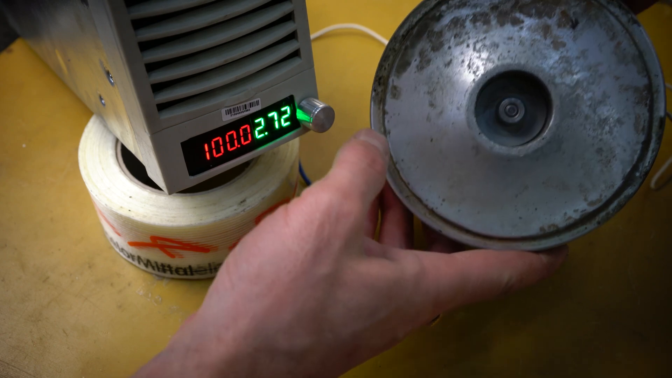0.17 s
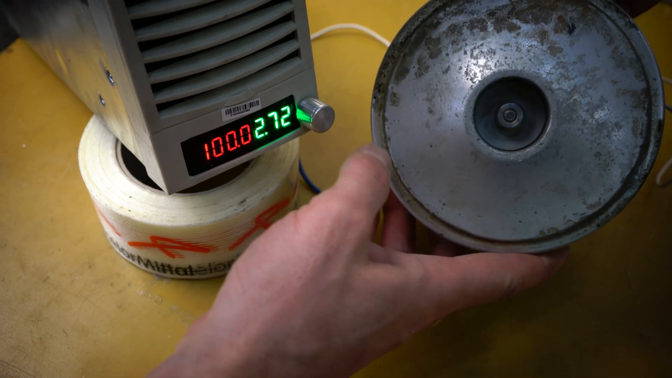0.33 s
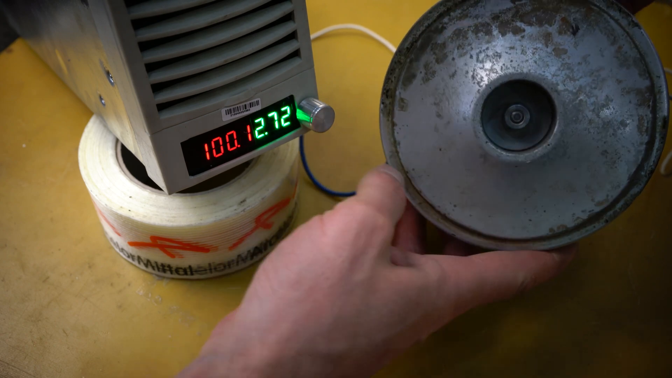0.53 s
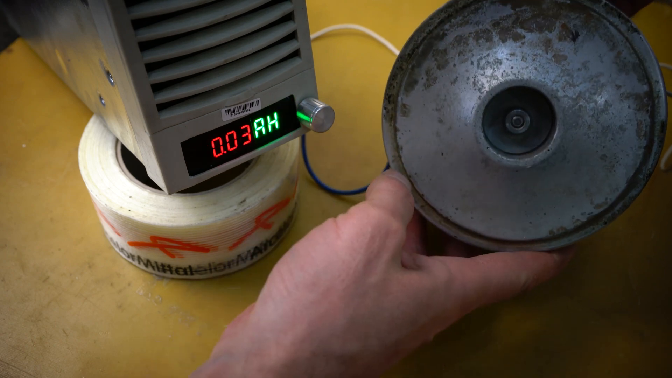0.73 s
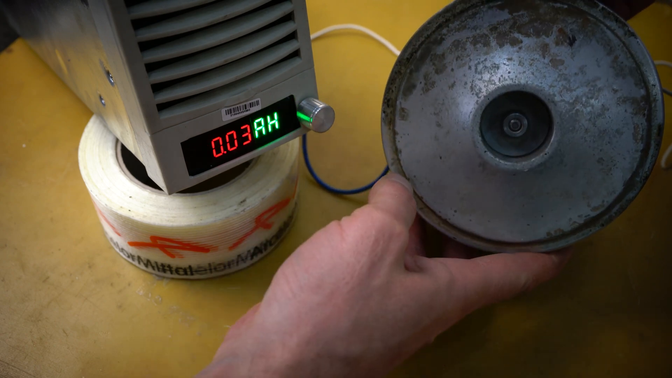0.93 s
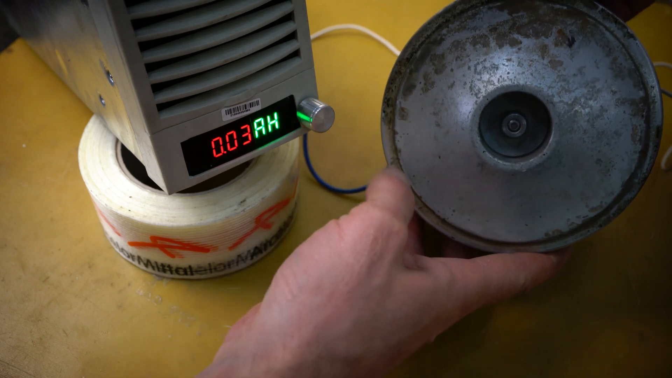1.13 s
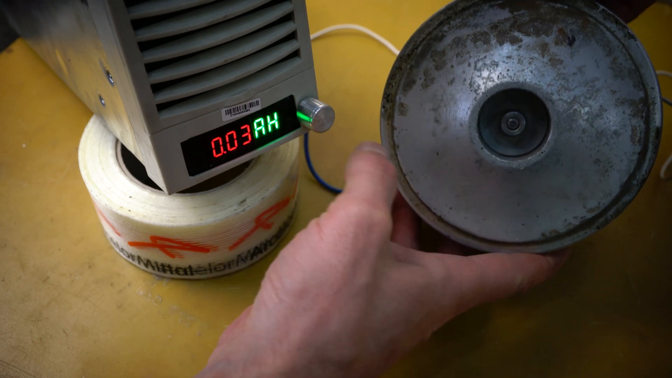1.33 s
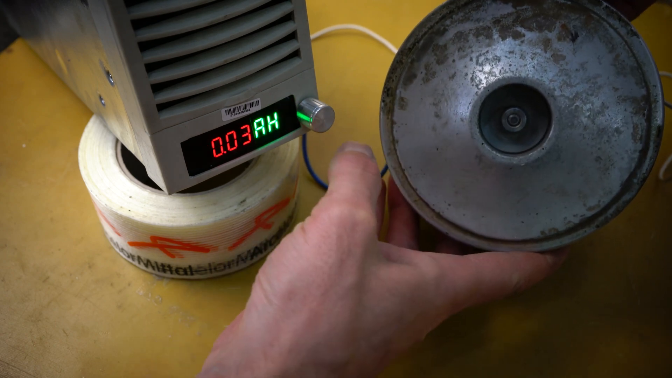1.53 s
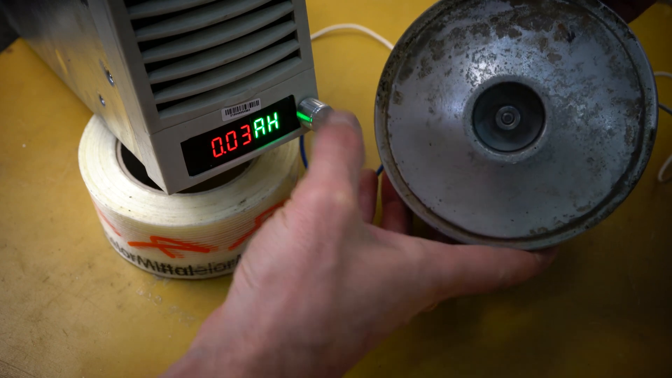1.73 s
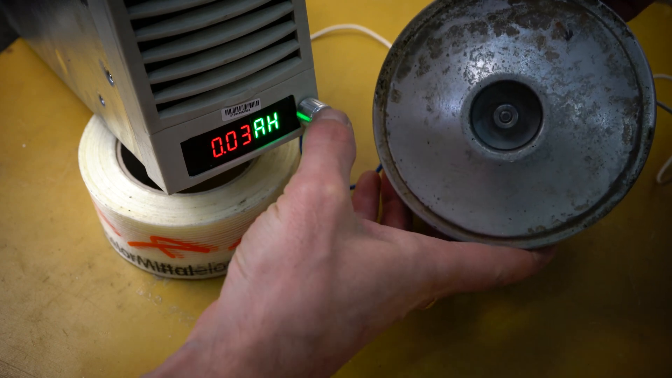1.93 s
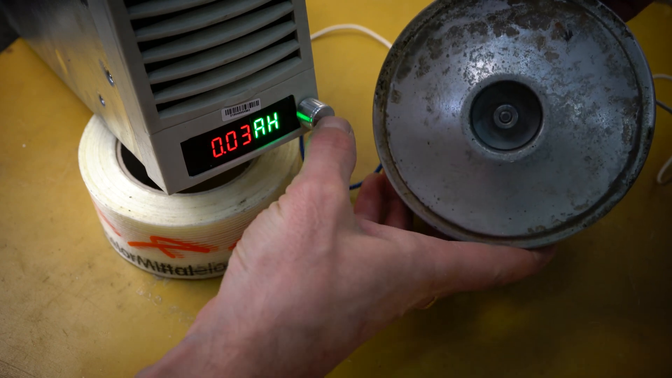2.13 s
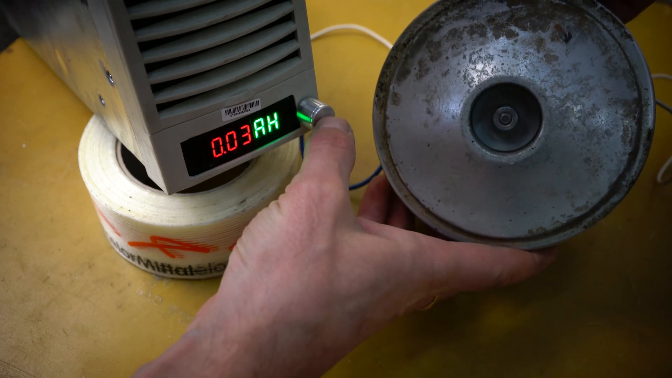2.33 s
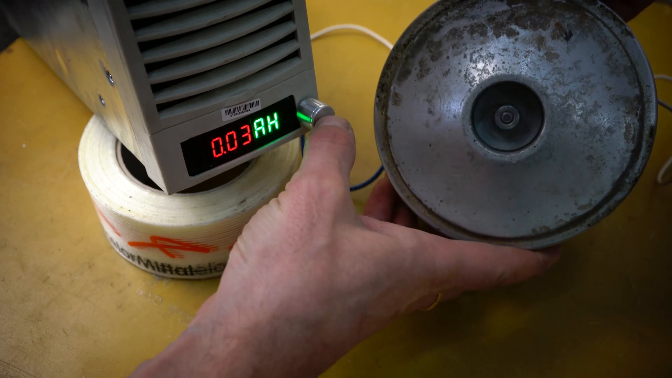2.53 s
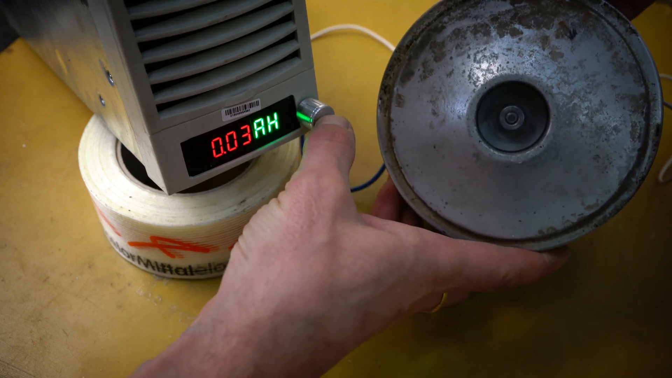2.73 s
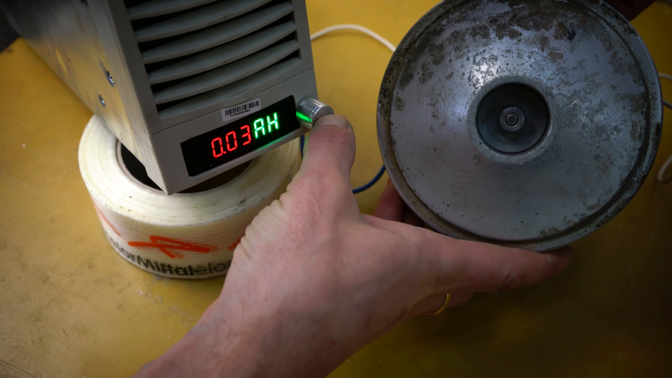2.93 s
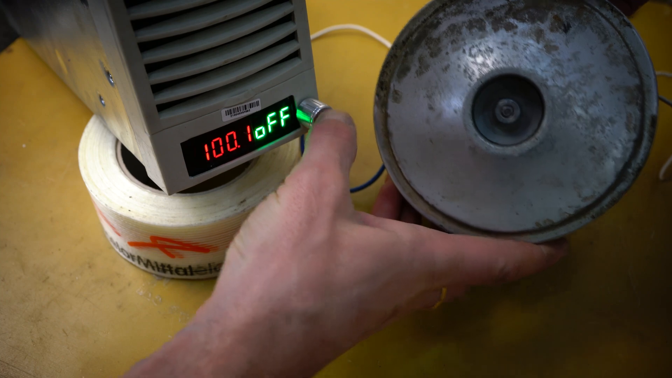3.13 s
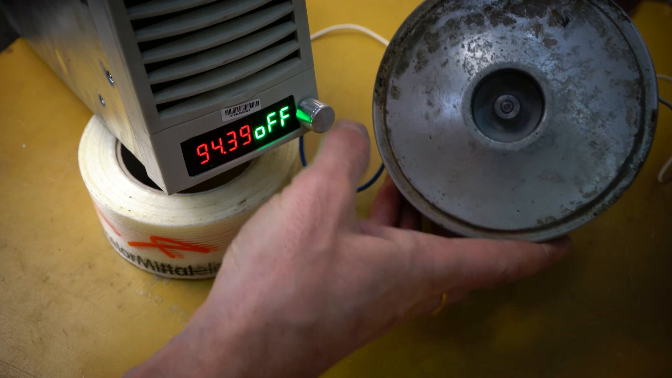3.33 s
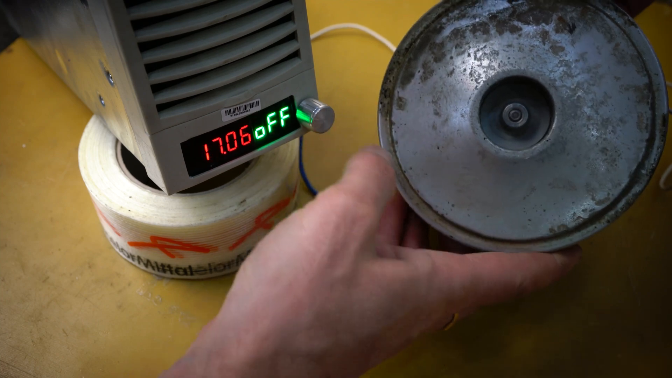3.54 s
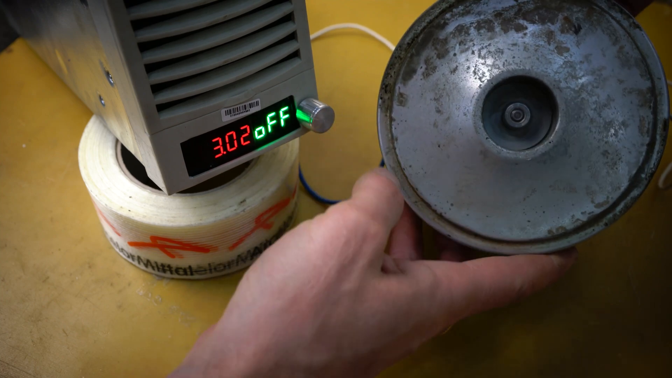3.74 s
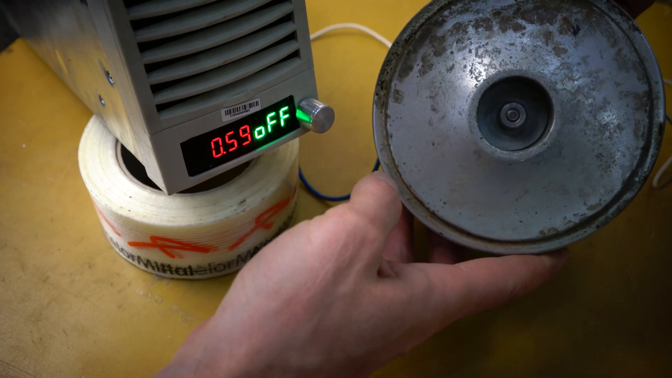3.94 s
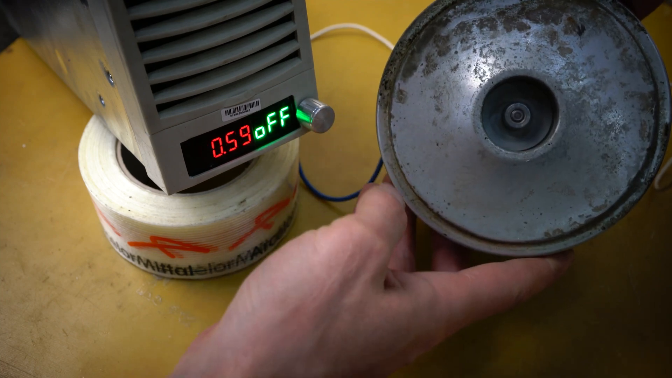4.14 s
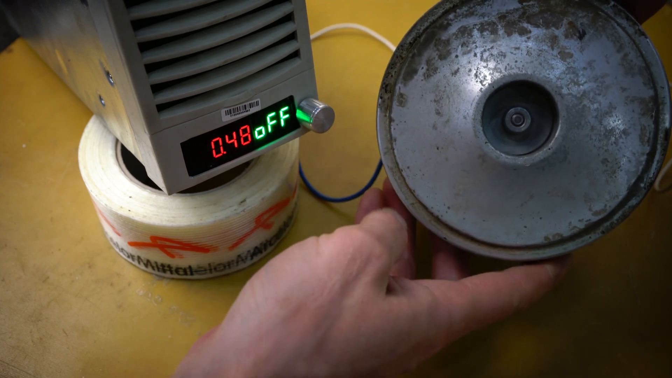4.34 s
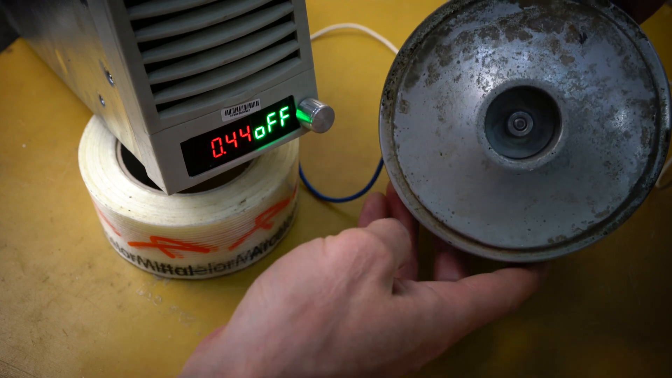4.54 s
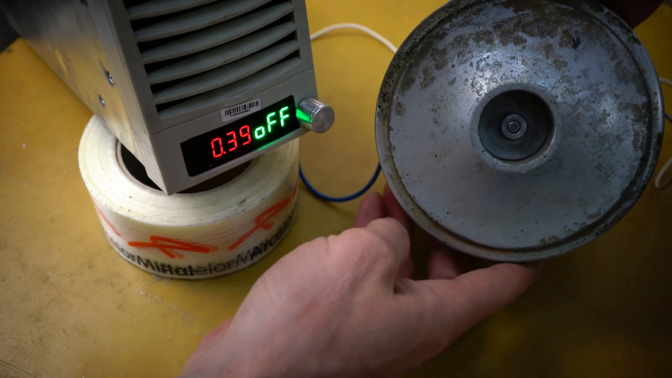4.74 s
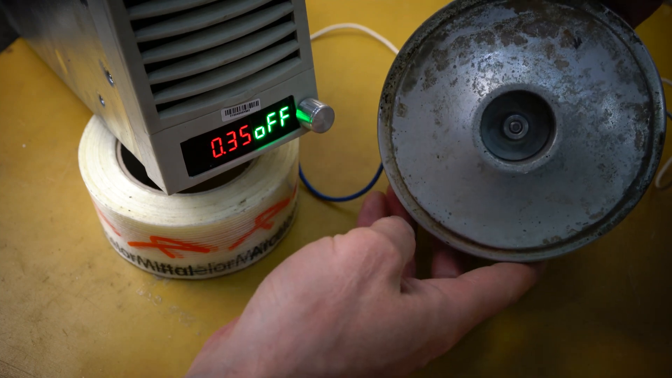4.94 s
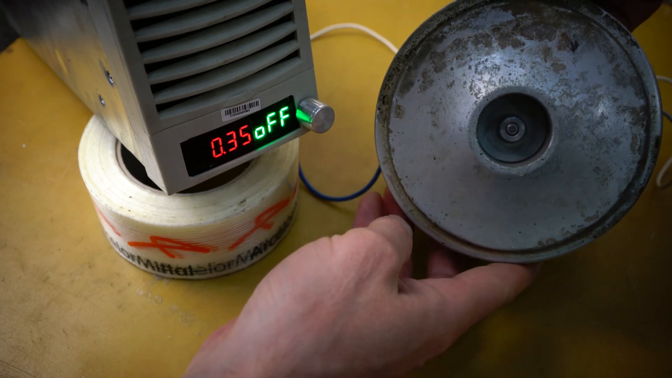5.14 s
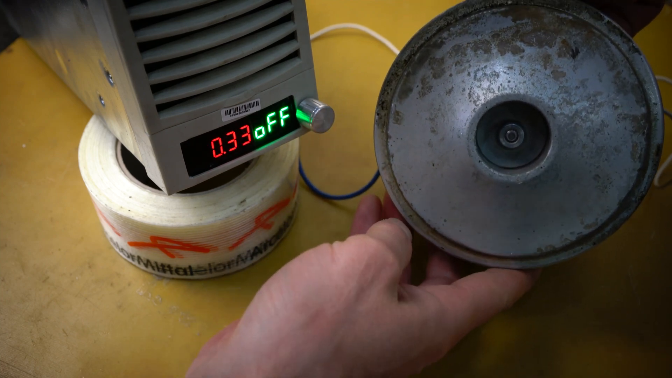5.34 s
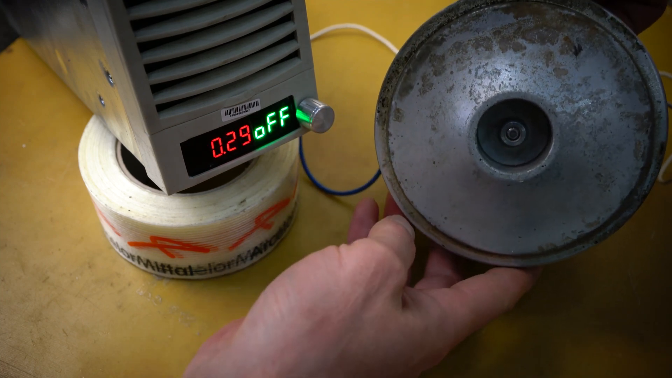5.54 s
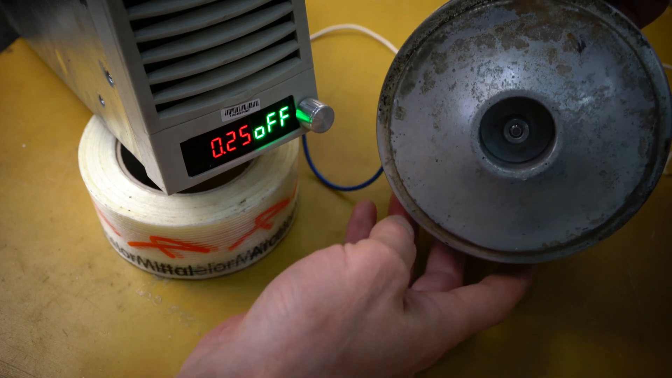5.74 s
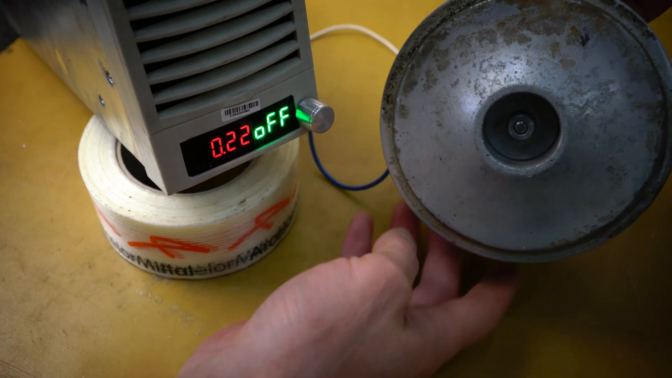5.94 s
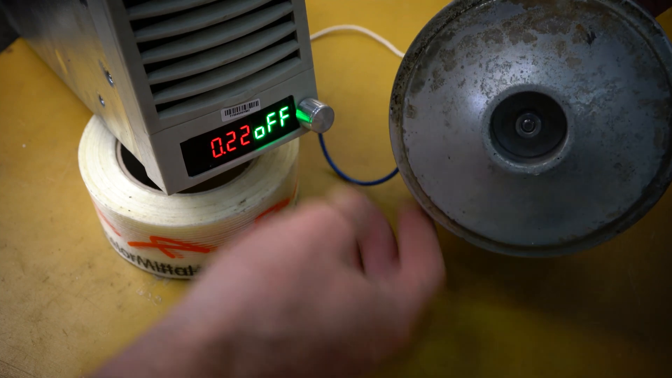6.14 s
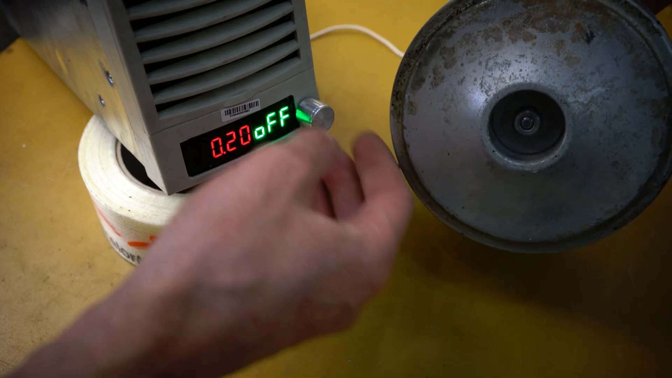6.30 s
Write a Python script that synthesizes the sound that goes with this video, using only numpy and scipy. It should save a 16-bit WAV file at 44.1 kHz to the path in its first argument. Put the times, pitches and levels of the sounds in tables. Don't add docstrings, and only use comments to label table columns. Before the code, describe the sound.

Close up, a small high-speed electric fan motor screams steadily, then cuts out, its whine sliding lower while loose brushes scrape and metal rings.

```python
import sys
import numpy as np
from scipy import signal
from scipy.fft import rfft, irfft
from scipy.io import wavfile

SR = 44100
rng = np.random.default_rng(int(sys.argv[2]) if len(sys.argv) > 2 else 0)


def generate_wav(signal):
    frames = np.transpose(np.atleast_2d(signal))
    scaled = np.clip(frames, -1, 1) * 32767
    pcm = np.round(scaled).astype(np.int16)
    wavfile.write(sys.argv[1], SR, pcm)


def level_to_linear(level):
    exponent = np.asarray(level, float) / 20
    return 10 ** exponent


N = 285327
SLOW = 40

# t/s, brush scrape level/dB, low rumble lift/dB, shaft orders level/dB
SHAKE = [
    (0, -2.5, 1.5, -0.5),
    (3.2, -5, 0, -4),
    (3.45, 8.5, 3.5, -7),
    (3.7, 9.5, 3.5, -2),
    (4.15, 9, 5, 3.5),
    (4.4, 8.5, 6.5, -0.5),
    (4.95, 4.5, 6.5, -3),
    (5.55, 3.5, 4.5, -6),
    (6.0, 4, 0, -12.5),
    (6.47, 2, 0, -13),
]


def rms_one(x):
    return x / np.sqrt(np.mean(x ** 2) + 1e-20)


def in_time(rows):
    s, *columns = np.transpose(rows)
    return [np.interp(np.arange(N) / SR, s, c) for c in columns]


def bumps(rows, width_s):
    t = np.arange(N) / SR
    return sum(db * np.exp(-.5 * ((t - s) / width_s) ** 2) for s, db in rows)


def drift(rate):
    r = np.exp(-2 * np.pi * SLOW * rate / SR)
    warm_up = 2000
    noise = rng.standard_normal(N // SLOW + 1 + warm_up)
    return rms_one(signal.lfilter([1], [1, -2 * r, r * r], noise)[warm_up:])


def swell(db):
    return np.interp(np.arange(N) / SLOW, np.arange(len(db)), level_to_linear(db))


def resonate(x, hz, width_hz):
    r = np.exp(-np.pi * width_hz / SR)
    feedback = [1, -2 * r * np.cos(2 * np.pi * hz / SR), r * r]
    return signal.lfilter(np.array([1, 0, -1]) * (1 - r * r) / 2, feedback, x)


def modes(x, table, through_db):
    out = level_to_linear(through_db) * x
    for k, (hz, width, db) in enumerate(table):
        out = out + (-1) ** k * level_to_linear(db) * resonate(x, hz, width)
    return out


def response(table, hz, through_db):
    power = level_to_linear(2 * through_db)
    for centre, width, db in table:
        power = power + level_to_linear(2 * db) / (1 + (2 * (hz - centre) / width) ** 2) ** 2
    return np.sqrt(power)


def orders(table, speed, wobble_db, rate):
    angle = 2 * np.pi * np.cumsum(speed) / SR
    out = 0
    for k, db in table:
        sine = np.sin(k * angle + 2 * np.pi * rng.random())
        audible = k * speed < .4 * SR
        out = out + swell(db + wobble_db * drift(rate)) * sine * audible
    return np.sqrt(2) * out


def sliding(table, resonances, through_db, speed, wobble_db, rate):
    slow = np.arange(0, N, SLOW)
    out = 0
    for k, db in table:
        gain = np.interp(np.arange(N), slow, response(resonances, k * speed[slow], through_db))
        out = out + gain * orders([(k, db)], speed, wobble_db, rate)
    return out


def banded_noise(spectrum, patchy_db, gust, lift_db=0, lift_hz=900):
    hz_points, db_points = np.transpose(spectrum)
    octaves = np.log2(hz_points[-1] / hz_points[0])
    edges = hz_points[0] * 2 ** np.arange(0, octaves + 1 / 3, 1 / 3)
    white = rng.standard_normal((2, N)) * np.sqrt(SR / 2)
    out = 0
    for k, (low, high) in enumerate(zip(edges, edges[1:])):
        band_pass = signal.butter(2, [low, min(high, .45 * SR)], "band", fs=SR, output="sos")
        band = signal.sosfilt(band_pass, white[k % 2])
        level_db = np.interp(np.log(low * high) / 2, np.log(hz_points), db_points)
        level_db = level_db + lift_db * (low < lift_hz)
        out = out + swell(level_db + patchy_db * (gust + 0.66 * drift(11.4))) * band
    return out


def narrow_noise(length, hz, width_hz):
    warm_up = 2000
    noise = rng.standard_normal(length + warm_up)
    return rms_one(resonate(resonate(noise, hz, width_hz), hz, width_hz)[warm_up:])


def room_rumble():
    # f/Hz, level/dB per Hz
    spectrum = [(22, -113), (60, -98), (130, -89), (250, -88), (420, -83), (800, -99)]
    return banded_noise(spectrum, patchy_db=2.0, gust=drift(2.2))


def side_flickers():
    # t/s, low f/Hz, high f/Hz, level/dB
    flickers = [(0.257, 14470, 15700, -30), (0.815, 9560, 11800, -21), (0.816, 13006, 14470, -31),
                (1.328, 4220, 5167, -34), (1.373, 14384, 15700, -34), (1.743, 10249, 11800, -20),
                (1.839, 6287, 7665, -32), (1.862, 8957, 10422, -27), (2.137, 11627, 13092, -31),
                (2.649, 7579, 9043, -28), (2.674, 9560, 11800, -20), (2.674, 14470, 15700, -32),
                (3.136, 11714, 13092, -31), (3.252, 13092, 14470, -34), (3.253, 4220, 5254, -31),
                (3.253, 11025, 12403, -26), (3.484, 4565, 5770, -28), (3.486, 13006, 14470, -31),
                (3.487, 8871, 11111, -23), (3.901, 11714, 13178, -31), (3.902, 13781, 15245, -29),
                (3.949, 11025, 12489, -31), (4.228, 5684, 7665, -26), (4.228, 13781, 15159, -30),
                (4.229, 8957, 11111, -31), (4.53, 11025, 13781, -33), (4.597, 11714, 13092, -33),
                (4.6, 5684, 7665, -30), (4.715, 12403, 13781, -33), (5.095, 13781, 15700, -32)]
    out, size = np.zeros(N), 2048
    hz = np.fft.rfftfreq(size, 1 / SR)
    window = signal.windows.kaiser_bessel_derived(size, 4 * np.pi)
    for s, low, high, db in flickers:
        spectrum = rfft(rng.standard_normal(size)) * (hz > low) * (hz < high)
        at = int(s * SR) - size // 2
        out[at:at + size] += level_to_linear(db - 2.0) * window * rms_one(irfft(spectrum))
    return out


def air(gust):
    # t/s, air flow level/dB, outlet opening level/dB
    flow = [(0, -25.5, -2.5), (.12, -26.5, -1), (.32, -27, -1.5), (.5, -29, -2), (1.0, -26.5, -2),
            (3.15, -26.5, -2), (3.35, -24, -2), (3.6, -24.5, -4), (3.93, -26, -2), (4.4, -30.5, -0.5),
            (4.78, -34, 1.5), (5.46, -37.5, 2), (5.75, -38.5, 4.5), (5.9, -40.5, 2), (6.47, -43, -6)]
    # t/s, level/dB
    gusts = [(.04, -5), (.1, 1.5), (.17, 2.5), (.23, 2), (.3, 2), (.48, -1.5), (.75, 1.5), (.88, -0.5),
             (1.11, -2), (1.18, 2), (1.23, -2), (1.49, 1.5), (1.62, 0), (1.69, 1), (1.9, 0.5),
             (1.935, -1.5), (2.03, 1), (2.06, -2), (2.1, 2.5), (2.16, -1), (2.24, -0.5), (2.57, -2.5),
             (2.61, 5), (2.81, -3), (2.9, 3), (3.02, -4), (3.07, 2), (3.18, 1), (3.22, -2.5), (3.31, -1),
             (3.37, 1.5), (3.52, 0.5), (3.57, -2), (3.73, 3), (3.86, -2.5), (3.92, 1), (3.99, 1),
             (4.1, 1.5), (4.15, -1), (4.26, 2), (4.31, -2.5), (5.19, -1), (5.73, 1), (5.87, 0)]
    # f/Hz, level/dB per Hz
    rush_spectrum = [(22, -101), (60, -100), (120, -86.5), (250, -75.5), (420, -68), (850, -57.5),
                     (1450, -56), (1800, -52.5), (2200, -58), (3300, -54.5), (4000, -65), (5600, -76)]
    # f/Hz, level/dB per Hz
    hiss_spectrum = [(3000, -108), (4300, -66), (5600, -58.5), (7600, -65), (8600, -59), (10800, -64.5),
                     (13500, -61.5), (15000, -59), (17000, -64.5)]
    flow_db, outlet_db = in_time(flow)
    puffs_db = bumps(gusts, width_s=0.019)
    rumble_lift_db = in_time(SHAKE)[1][::SLOW]
    rush = banded_noise(rush_spectrum, patchy_db=.45, gust=gust, lift_db=rumble_lift_db)
    hiss = banded_noise(hiss_spectrum, patchy_db=.3, gust=gust)
    rush_gain = level_to_linear(flow_db + puffs_db + 26)
    hiss_gain = level_to_linear(flow_db + outlet_db + 0.53 * puffs_db + 28.0)
    return rush_gain * rush + hiss_gain * hiss


def brushes(gust):
    # f/Hz, level/dB per Hz
    scrape_spectrum = [(500, -75), (900, -72), (1300, -56.5), (2200, -53), (3300, -71.5), (5000, -59),
                       (7000, -59.5), (9000, -63), (16000, -61)]
    # f/Hz, width/Hz, level/dB
    cover_modes = [(947, 9.6, -3), (1135, 54, 2.5), (1257, 100, -4), (1300, 44, 1.5), (1417, 29, 0),
                   (1540, 27, -2.5), (1590, 90, -11), (1938, 73, -4.5), (2293, 45, -15)]
    # f/Hz, width/Hz, level/dB
    frame_modes = [(2910, 63, -10), (3270, 57, -20), (3940, 210, -5), (4810, 51, -5), (5675, 83, -3.5),
                   (6130, 32, -4.5), (6670, 210, -4), (7680, 270, -4.5), (7770, 240, -8)]
    scrape = banded_noise(scrape_spectrum, patchy_db=1.5, gust=gust)
    frame_fade_db = np.interp(np.arange(N) / SR, [5.75, 6.3], [0, -3])
    frame = level_to_linear(frame_fade_db) * modes(scrape, frame_modes, through_db=-57)
    cover = modes(scrape, cover_modes, through_db=-17.5)
    return level_to_linear(in_time(SHAKE)[0]) * (cover - frame)


def bench(x):
    # f/Hz, width/Hz, depth 0-1
    echo_dips = [(695, 840, 0.13), (995, 93, 0.19), (1823, 96, .5), (2380, 87, 0.48), (2820, 36, 0),
                 (3620, 79, 0.36), (5160, 320, 0.27), (6760, 110, 0.57)]
    # f/Hz, width/Hz, depth 0-1
    late_dips = [(5260, 380, 0.65), (4200, 300, 0.2), (650, 390, 0.3), (2830, 450, 0.23), (8050, 980, 0.5),
                 (9900, 900, 0.2), (11900, 900, .3), (7100, 400, .3)]
    for hz, width, depth in echo_dips:
        x = x - depth * resonate(x, hz, width)
    settled = np.interp(np.arange(N) / SR, [4.65, 6.7], [0, 1])
    for hz, width, depth in late_dips:
        x = x - settled * depth * resonate(x, hz, width)
    return x


def inlet():
    # f/Hz, width/Hz, level/dB
    cavities = [(9480, 260, -13), (11800, 450, -14), (10640, 260, -4), (10865, 130, -3), (11220, 300, -7),
                (11450, 390, -9), (10900, 1800, -3.5)]
    # t/s, level/dB
    surges = [(.3, 4), (1.03, 4), (1.54, 3), (1.9, 3), (2.31, -2), (2.35, 5.5), (2.68, -4), (2.71, 4),
              (3.12, -1), (3.17, 3), (3.24, 0)]
    # start t/s, end t/s, f/Hz, width/Hz,
    # level/dB
    patches = [(-.1, 3.95, 8350, 1300, -30), (-.1, 1.62, 9520, 250, -32), (1.62, 3.3, 9500, 500, -36),
               (1.62, 3.3, 9750, 400, -37), (3.3, 3.6, 9400, 900, -32), (3.6, 3.86, 9320, 50, -29),
               (3.58, 3.8, 14850, 700, -27), (3.8, 4.0, 14200, 350, -31), (5.6, 6.6, 640, 40, -58),
               (5.88, 6.16, 2270, 70, -44), (5.88, 6.4, 1950, 50, -43), (4.3, 5.2, 15000, 900, -37),
               (4.1, 4.3, 11050, 600, -31), (.28, 2.6, 15010, 90, -36.5), (.55, 3.45, 10100, 700, -30),
               (-.1, .55, 10100, 700, -37), (3.63, 3.85, 9080, 50, -31), (1.15, 1.62, 9900, 800, -29),
               (4.21, 4.28, 1960, 25, -25), (5.15, 5.55, 6100, 700, -36), (-.1, 6.6, 428, 30, -54.5),
               (4.1, 4.8, 135, 30, -64), (-.1, .42, 11430, 350, -27), (.82, .88, 11400, 400, -27),
               (1.11, 1.19, 11450, 500, -28), (1.59, 1.73, 11400, 450, -26), (2.15, 2.31, 11250, 400, -28),
               (2.57, 2.67, 11350, 400, -27), (2.84, 2.94, 11300, 400, -25), (3.1, 3.22, 11250, 400, -27),
               (1.92, 2.07, 10100, 600, -29), (2.6, 3.25, 15020, 80, -40), (.1, .45, 12790, 40, -43),
               (3.55, 3.72, 4800, 90, -38), (3.7, 4.15, 170, 80, -56), (5.55, 5.8, 13100, 600, -43),
               (4.95, 5.02, 4850, 50, -37), (4.45, 4.5, 4850, 50, -37), (5.6, 6.6, 950, 30, -50),
               (4.97, 5.05, 1420, 25, -28), (4.45, 4.52, 1150, 25, -28), (4.0, 5.3, 15500, 500, -40)]
    t = np.arange(N) / SR
    blown = 0
    for hz, width, db in cavities:
        blown = blown + swell(db + 1.8 * drift(12.0)) * narrow_noise(N, hz, width)
    sag_db = np.interp(t, [3.32, 3.47, 3.5, 3.9], [0, -8, -9, -38])
    out = level_to_linear(-19.5 + bumps(surges, width_s=0.0055) + sag_db) * rms_one(blown)
    for start, end, hz, width, db in patches:
        span = slice(max(int(start * SR), 0), min(int(end * SR), N))
        gate = np.clip(np.minimum(t - start, end - t) / 0.018, 0, 1)[span]
        level = swell(db + 1.9 * drift(9.3))[span]
        out[span] += level * gate * narrow_noise(len(gate), hz, width)
    return out


def coasting():
    full_speed, off_s, current_dies_s = 278.1, 3.2435, .018
    friction, oil_drag, fan_drag = 27.57, .093, .001543
    shift = oil_drag / (2 * fan_drag)
    scale = np.sqrt(friction / fan_drag - shift ** 2)
    since = current_dies_s * np.logaddexp(0, (np.arange(N) / SR - off_s) / current_dies_s)
    return scale * np.tan(np.arctan((full_speed + shift) / scale) - scale * fan_drag * since) - shift


def magnetic_hum(speed):
    pulls = [(1, -63), (6, -43), (12, -48), (18, -48), (20, -49), (27, -49), (39.22, -42), (49.34, -48),
             (50.46, -49), (21, -49), (23, -48), (24, -46), (25, -46), (36.27, -45), (39.1, -40),
             (40.1, -42), (46.02, -47), (46.4, -42), (46.77, -47), (50, -46), (54.01, -46)]
    current_db = np.interp(np.arange(N) / SR, [3.22, 3.5], [0, -30])
    return level_to_linear(current_db) * orders(pulls, speed, wobble_db=3.0, rate=4.3)


def bearing_whirl(speed):
    whirl_orders = [(3, -35), (4, -36), (4.035, -23)]
    # f/Hz, width/Hz, level/dB
    base = [(619, 39, 3.5), (970, 82, 2), (1010, 60, -10), (1055, 74, -6), (1095, 67, -3), (1143, 76, -4.5)]
    # t/s, level/dB
    strength = [
        (0, -2),
        (3.2, -3),
        (3.4, -7),
        (3.55, 0),
        (3.9, -1),
        (4.15, -19),
    ]
    # t/s, level/dB
    falters = [(.4, -2), (.55, -14), (.77, -8), (.99, -15), (1.15, -13), (1.36, -5), (1.55, -4),
               (1.78, -10), (2.03, -16), (2.35, -10), (2.55, -6), (2.75, -7), (3.1, -14)]
    level_db = in_time(strength)[0] + bumps(falters, width_s=0.023)
    return level_to_linear(level_db) * sliding(whirl_orders, base, -29, speed, wobble_db=1.9, rate=11.6)


def bearing_rattle(speed):
    rattle_orders = [(6, -18.5), (7.03, -19), (8.03, -19.5)]
    # f/Hz, width/Hz, level/dB
    end_cap = [(940, 49, -8), (1125, 79, -2.5), (1200, 66, -0.5), (1310, 78, -2), (1420, 72, 2),
               (1540, 55, -5)]
    # t/s, level/dB
    loose = [(3.2, -20), (3.45, -12), (3.53, -9), (3.7, -9), (3.77, 1), (3.86, -1), (4.0, -7), (4.07, -2),
             (4.25, -2), (4.35, -10), (4.48, -5), (4.6, -8), (5.0, -14), (5.3, -40)]
    return level_to_linear(in_time(loose)[0]) * sliding(rattle_orders, end_cap, -25, speed, wobble_db=2.0, rate=17.0)


def fifth_order(speed):
    fifth = [(5.032, -30.5)]
    # f/Hz, width/Hz, level/dB
    bell = [(1426, 120, 2.5), (1260, 100, -7), (1180, 57, 8.5), (1104, 72, 2.5), (934, 63, 2.5)]
    fade_db = np.interp(np.arange(N) / SR, [4.1, 4.6], [0, -40])
    return level_to_linear(fade_db) * sliding(fifth, bell, -27, speed, wobble_db=1.5, rate=18.0)


def commutator_bars(speed):
    bar_orders = [(22, -30), (44, -35), (65, -42), (66, -35), (67, -42)]
    # multiple of shaft speed, level/dB
    edge_orders = [(87, -40), (88, -32.5), (89, -40), (110, -39)]
    # f/Hz, width/Hz, level/dB
    shell = [(1250, 200, -6), (1450, 120, -5), (1960, 120, -7), (2230, 110, -4), (2480, 130, -5),
             (2720, 90, -2), (3260, 150, 1), (3690, 220, 2), (4000, 120, -1), (4250, 200, -5),
             (4950, 260, -1), (5750, 600, 1), (6200, 260, -6)]
    # f/Hz, width/Hz, level/dB
    holder = [(2350, 250, -4), (2700, 90, -1), (3020, 80, 0), (3245, 110, 5), (3420, 200, -5),
              (3620, 160, -6), (3930, 110, 1), (4070, 70, 1), (4230, 100, -3), (4380, 100, -4),
              (4660, 300, -5), (5150, 300, -8), (5720, 350, 2), (6150, 400, 1), (6950, 200, -5),
              (7420, 300, -1), (7800, 200, 0), (8300, 200, -2), (6650, 150, -3), (9300, 350, -5),
              (10250, 600, -8), (11300, 700, -3), (12240, 300, -11), (14400, 900, -2)]
    # t/s, level/dB
    seats = [(0, -8), (.45, -11), (.75, -1.5), (3.2, 3), (4.25, 0.5), (4.5, -3), (4.75, -3), (5.0, 1),
             (5.7, -1), (6.1, -1), (6.3, -10), (6.47, -15)]
    # t/s, level/dB
    bounce = [
        (4.6, -12),
        (4.8, -4),
        (5.0, -8),
        (5.35, -8),
        (5.45, 0),
        (5.6, -2),
        (5.85, -4),
        (5.93, -18),
    ]
    lowest = sliding(bar_orders[:1], shell, -18, speed, wobble_db=1.6, rate=14.0)
    upper = sliding(bar_orders[1:], holder, -13, speed, wobble_db=1.6, rate=14.0)
    edges = sliding(edge_orders, holder, -12, speed, wobble_db=1.6, rate=14.0)
    return level_to_linear(in_time(seats)[0]) * (lowest + upper + level_to_linear(in_time(bounce)[0]) * edges)


def fan_blades(speed):
    # t/s, level/dB
    strength = [(0, -24.5), (.3, -22.5), (.5, -26.5), (.7, -24), (.9, -21.5), (1.3, -22.5), (1.45, -22),
                (2.0, -24.5), (2.1, -23.5), (2.3, -20.5), (2.6, -22), (2.9, -21.5), (3.2, -23.5),
                (3.6, -21.5), (4.2, -22), (4.7, -27), (5.0, -42), (5.5, -65)]
    # f/Hz, width/Hz, level/dB
    duct = [(2500, 94, -0.5), (2240, 140, 0.5), (2057, 79, 1.5), (1930, 50, -2), (1780, 100, -9),
            (1670, 110, -6), (1543, 42, 1), (1435, 54, -3), (1175, 340, -1.5)]
    return level_to_linear(in_time(strength)[0]) * sliding([(9, 0)], duct, -28, speed, wobble_db=1.0, rate=24.0)


def shaken_cover(speed):
    # multiple of shaft speed, level/dB
    shaft_orders = [(3, -19), (10, -26), (11, -29.5), (12, -26.5), (13, -26.5), (14, -30), (15, -27.5),
                    (16.1, -33), (17, -26), (18, -29), (19, -37), (20, -23.5), (21, -26.5), (23, -38),
                    (24, -38), (25, -40), (26, -32), (27, -38), (28, -41), (29, -36), (30.3, -24)]
    # f/Hz, width/Hz, level/dB
    cover_modes = [(948, 17, -7), (1144, 73, 2.5), (1230, 110, -4), (1296, 37, -4.5), (1423, 31, 0.5),
                   (1538, 37, -1.5), (1617, 87, -12), (1954, 54, -8), (2280, 90, -17)]
    shake = level_to_linear(in_time(SHAKE)[2]) * orders(shaft_orders, speed, wobble_db=2.8, rate=11.0)
    radiates = signal.butter(3, [800, 2600], "band", fs=SR, output="sos")
    return signal.sosfilt(radiates, modes(shake, cover_modes, through_db=-21))


def rotor(speed):
    bearing = bearing_whirl(speed) + bearing_rattle(speed) + fifth_order(speed)
    tones = magnetic_hum(speed) + commutator_bars(speed) + fan_blades(speed)
    return bearing + tones + shaken_cover(speed)


def scene():
    gust = drift(22.0)
    noise = bench(air(gust) + brushes(gust))
    mono = room_rumble() + noise + inlet() + rotor(coasting())
    return np.tile(mono, (2, 1))


def band_limit(x):
    return signal.sosfilt(signal.butter(12, 16650, fs=SR, output="sos"), x)


def record(dry):
    top_cut = signal.ellip(12, .5, 70, 15720, fs=SR, output="sos")
    mix = signal.sosfilt(top_cut, dry) + side_flickers() * [[1], [-1]]
    return band_limit(mix)


dry = scene()
out = record(dry)
generate_wav(out)
```